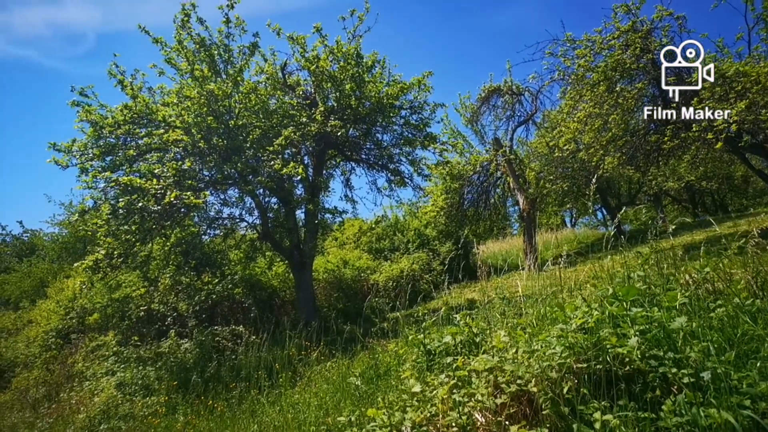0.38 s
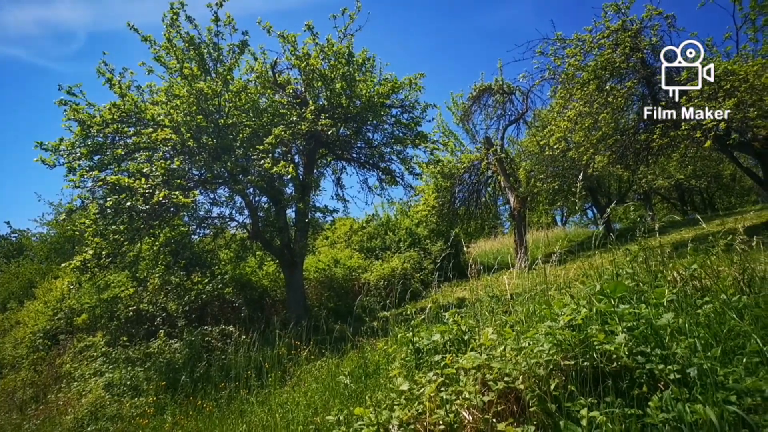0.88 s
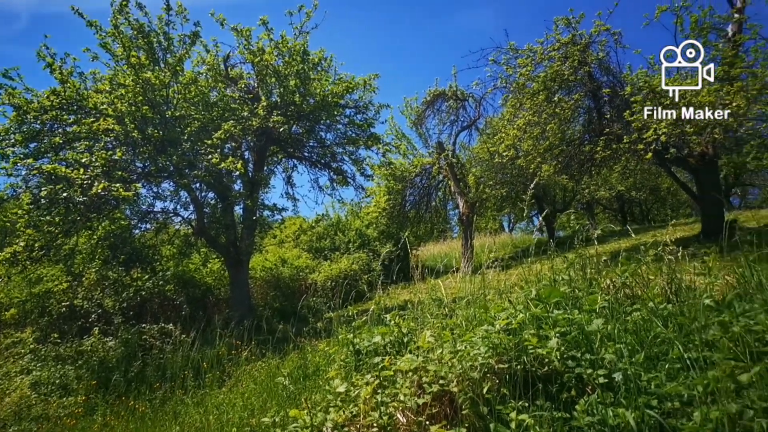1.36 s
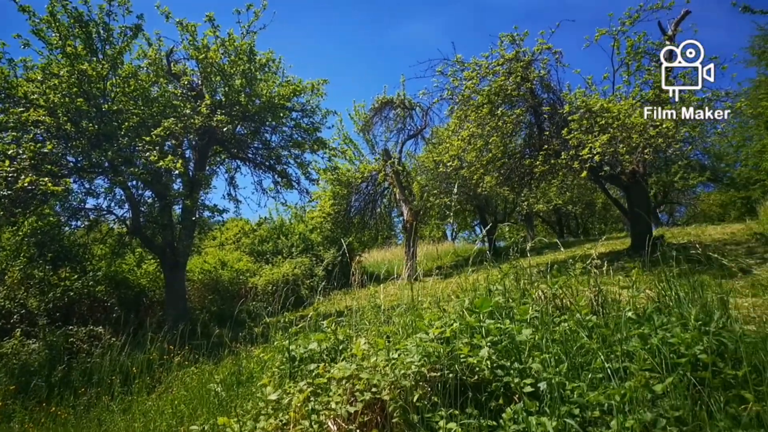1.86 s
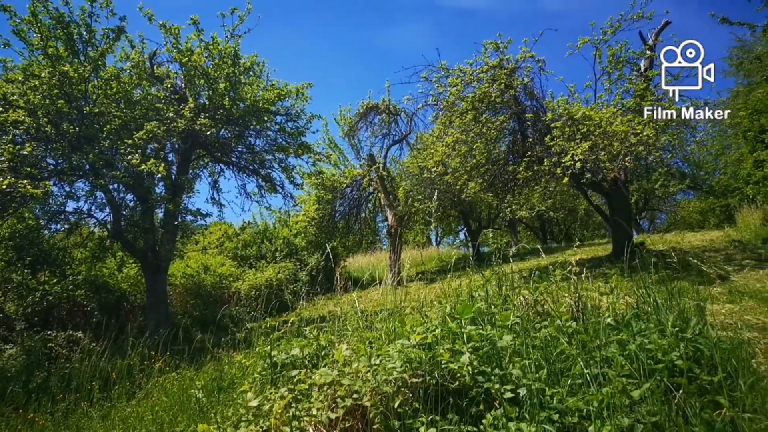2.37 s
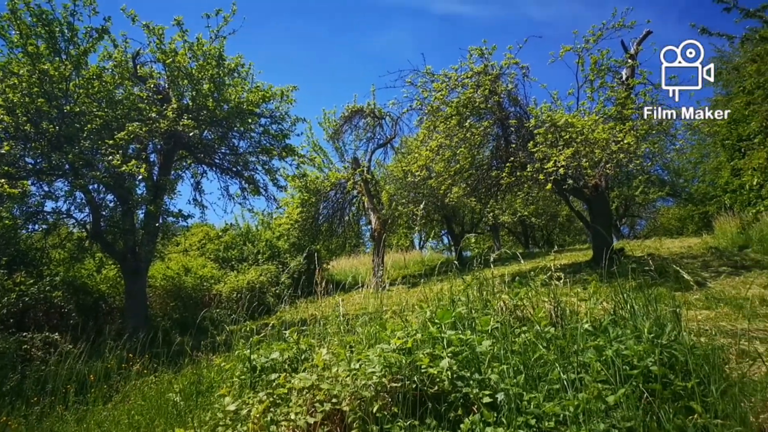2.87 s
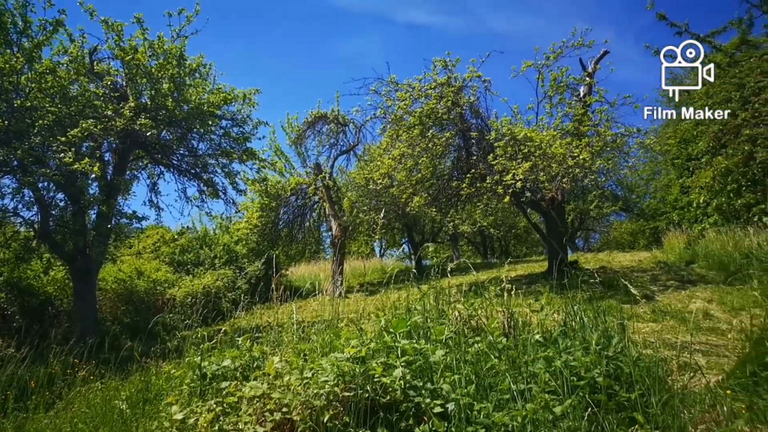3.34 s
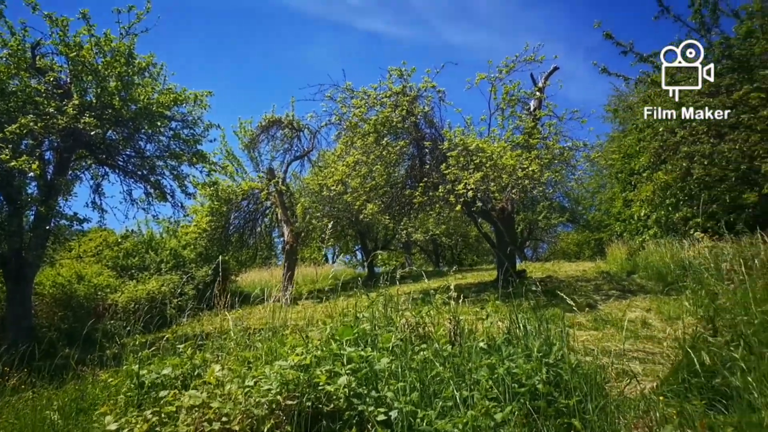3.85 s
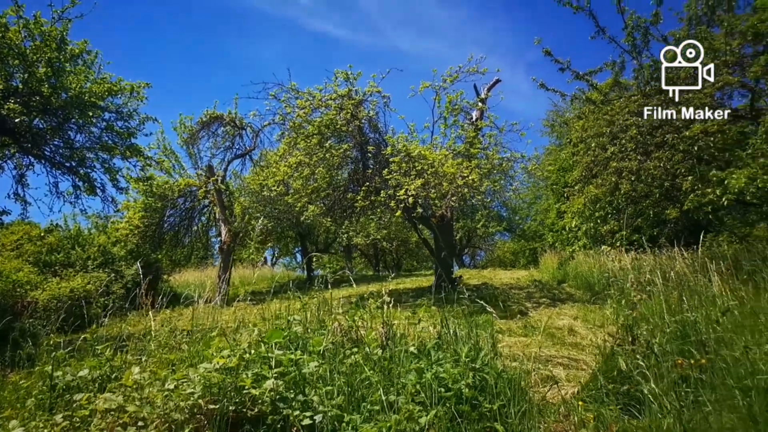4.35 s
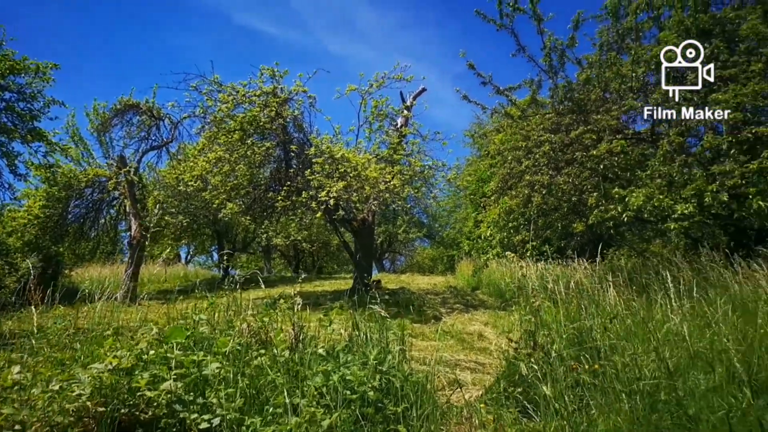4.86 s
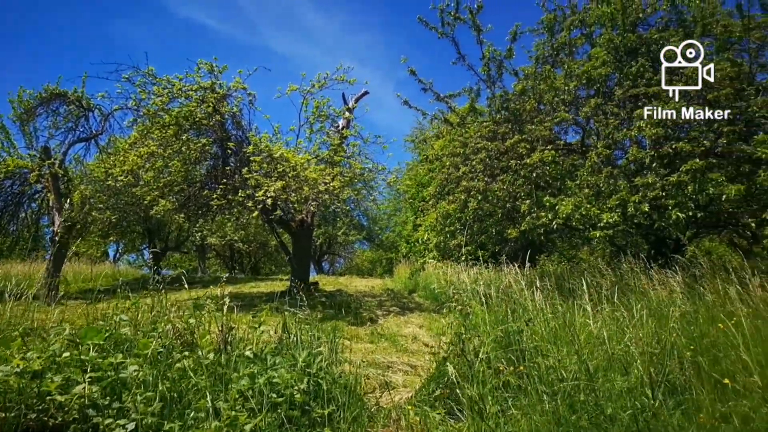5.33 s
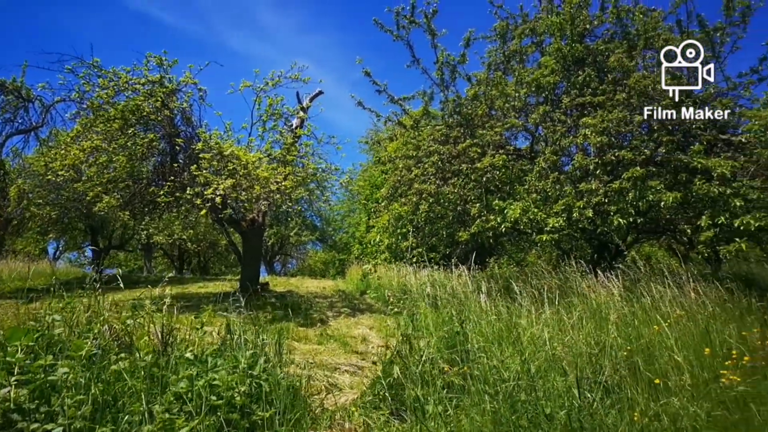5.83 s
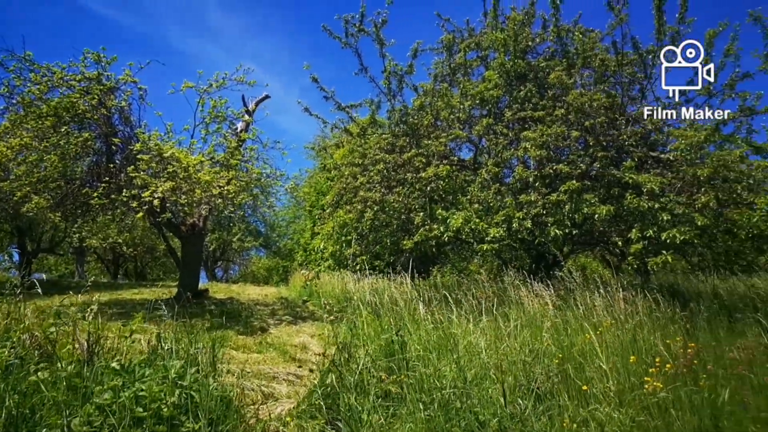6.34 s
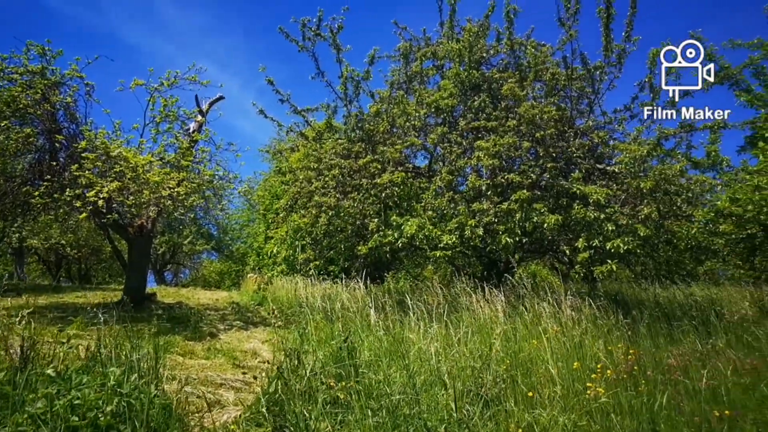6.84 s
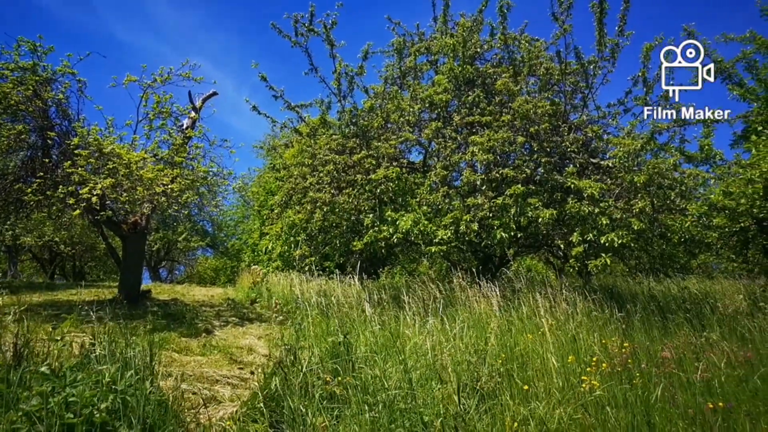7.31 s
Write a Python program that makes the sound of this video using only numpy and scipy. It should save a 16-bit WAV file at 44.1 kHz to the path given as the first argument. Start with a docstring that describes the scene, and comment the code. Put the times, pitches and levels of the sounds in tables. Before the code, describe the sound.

Several songbirds sing at once in an open orchard meadow. Steady high peeps alternate with falling hooks and warbles ahead, while a louder singer on the left gives sharp chirps, loops and a dry churr mid-way. Faint distant twitter fills the gaps. Low wind rumbles softly against the stereo microphone, and a dull thump comes after five seconds, then a softer one. Bright droplet-like notes and peeps close it.

```python
"""Songbirds in an orchard meadow: gliding sine tones make whistled notes, sweeps and fast trills from several
sides, each followed by an echo off a slope and by the decaying noise echoes of the trees. Far birds wheeze and
twitter on randomly modulated tones, and high noise bursts sound during two trills. Filtered noise makes a low drone
that swells in gusts, wind that buffets the two microphone ports, and still air; decaying low sines thump, then
thump softer."""
import sys
import numpy as np
from scipy import signal
from scipy.fft import rfft, irfft, next_fast_len
from scipy.io import wavfile
from scipy.ndimage import uniform_filter1d, map_coordinates

SR = 44100
rng = np.random.default_rng(int(sys.argv[2]) if len(sys.argv) > 2 else 0)


def unload_wav(signal):
    """Save mono or channel-first audio to the path in sys.argv[1] as 16-bit WAV at rate SR, clipped to [-1, 1]."""
    wavfile.write(
        sys.argv[1],
        SR,
        np.round(np.clip(np.atleast_2d(signal).T, -1, 1) * 32767).astype(np.int16),
    )


def makeup_ratio(level_db):
    """Linear amplitude ratio for a level in decibels (20 dB per factor of ten)."""
    decades = np.asarray(level_db, float) / 20
    return 10 ** decades


N = 339570


def unit(x):
    """Normalisation: scales a signal to rms 1."""
    return x / np.sqrt(np.mean(x ** 2) + 1e-20)


def along(points, hz):
    """Logarithmic frequency scale: interpolates (frequency [Hz], value) points."""
    f, v = np.transpose(points)
    return np.interp(np.log(hz + 1), np.log(f + 1), v)


def wobble(rate, size=N):
    """Band-limited fluctuation: a smooth random curve through `rate` knots a second."""
    knots = rng.standard_normal(int(size * rate / SR) + 4)
    return map_coordinates(knots, [np.arange(size) * rate / SR])


def rush(spectrum, alike):
    """Partial coherence: shaped stereo noise of rms 1; `alike` is the correlation of its sides."""
    m = next_fast_len(N)
    gain = makeup_ratio(along(spectrum, np.fft.rfftfreq(m, 1 / SR)))
    mid, side = irfft(rfft(rng.standard_normal((2, m))) * gain, m)[:, :N]
    turn = np.arccos(np.clip(alike, -1, 1)) / 2
    return unit(np.cos(turn) * mid + np.sin(turn) * side * np.array([[1], [-1]]))


def swell(size, rise, fall):
    """Onset and decay: linear ramps in seconds, neither over a third of the sound."""
    t = np.arange(size) / SR
    rise, fall = min(rise, t[-1] / 3), min(fall, t[-1] / 3)
    return np.clip(t / rise, 0, 1) * np.clip((t[-1] - t) / fall, 0, 1)


def add(out, s, hz, gain, lead_ms, overtones=((1, 0),)):
    """Binaural cues: sings a pitch curve with a time and a level difference between the ports."""
    u = np.arange(len(hz))
    for port, side in zip(out, (1, -1)):
        heard = u + side * lead_ms * SR / 2000  # a positive lead brings the left port forward
        turns = np.interp(heard, u, np.cumsum(hz) / SR)
        voice = sum(makeup_ratio(db) * np.sin(2 * np.pi * k * turns) for k, db in overtones)
        shade_db = side * (14 * lead_ms - .7)
        note = np.sqrt(2) * makeup_ratio(shade_db) * np.interp(heard, u, gain) * voice
        spot = port[round(s * SR):][:len(u)]
        spot += note[:len(spot)]


def whistle(out, s, length, a, b, c, db, lead_ms, rise=0.00867, waver_db=0):
    """Frequency modulation: an arc through three pitches; held notes are pure, quick steep ones hoarse."""
    size = round((length + 0.004616) * SR)
    u = np.linspace(0, 1, size)
    hz = a * (1 - u) * (1 - 2 * u) + 4 * b * u * (1 - u) + c * u * (2 * u - 1)
    steep = min(np.ptp(hz) / length / 45000, 1)
    hz = hz * (1 + (.0015 + .03 * steep) * wobble(350, size))
    level_db = db + (2.0965 + 2.18 * steep) * wobble(103.15, size) + waver_db * wobble(34.23, size)
    add(out, s - .002, hz, makeup_ratio(level_db) * swell(size, rise, 0.00439), lead_ms)


def trill(out, s, length, a, b, sweep, rate, db, lead_ms, rough=0.026, overtones=((1, 0),), rasp_per_s=500):
    """Periodic frequency modulation: repeated sweeps; the voice weakens while the pitch jumps back."""
    t = np.arange(round(length * SR)) / SR
    beat = (t * rate + 0.017 * wobble(80, len(t))) % 1
    # averaging over this share of a beat rounds the jump back
    saw = uniform_filter1d(beat - .5, size=max(round(0.283 * SR / rate), 1))
    hz = a + (b - a) * t / length + sweep * saw
    pulse = .4 + np.sin(np.pi * beat)
    gain = makeup_ratio(db + 1.8 * wobble(150, len(t))) * pulse * swell(len(t), .006, .012)
    add(out, s, hz * (1 + rough * wobble(rasp_per_s, len(t))), gain, lead_ms, overtones)


AHEAD_LEAD_MS = .0033  # left lead of the singer ahead

# Arrival-time lead of the left singer as the ports turn: (time [s], left lead [ms])
LEFT_SINGER_LEAD = [(0, 0.237), (1.5, 0.0906), (3.8, 0.1615), (4.3, 0.23), (6.1, 0.2293), (7.7, 0.14)]


def singer_lead(singer, s):
    """Interaural time difference: how many milliseconds a singer reaches the left port first."""
    if singer == "left":
        return np.interp(s, *np.transpose(LEFT_SINGER_LEAD))
    return {"ahead": AHEAD_LEAD_MS, "far left": .265}[singer]


# Arrival-time lead of the trilling birds: (time [s], left lead [ms])
TRILL_SINGER_LEAD = [(.5, 0.038), (1.3, 0.0557), (2.25, 0.1303), (2.8, 0.12), (3.3, 0.1457), (4, 0.3057),
                     (6.5, 0.248), (7.5, 0.019)]


def trill_lead(s):
    """Interaural time difference: the left lead of trills, interpolated over time."""
    return np.interp(s, *np.transpose(TRILL_SINGER_LEAD))


# Strength of wind and drone: (time [s], buffet level [dB], drone level [dB])
GUST_LEVELS = [(0, -56.5, -64), (.35, -58, -49.5), (.85, -61, -49), (1.15, -43.5, -44), (1.7, -58, -54),
               (2.05, -55, -44), (2.45, -61, -54), (2.7, -55, -58.5), (3.2, -61.5, -60.5),
               (3.501, -64, -57.5), (4.3, -57.5, -56), (5.0, -54, -62), (5.35, -58, -47.5),
               (5.7, -56, -57.5), (6.3, -58.5, -67), (6.6, -51, -55), (7.349, -49, -60),
               (7.7, -48.5, -56.5)]


def gust_db(column):
    """Slow amplitude modulation: one level column interpolated over the scene."""
    points = np.transpose(GUST_LEVELS)
    return np.interp(np.arange(N) / SR, points[0], points[column])


# Spectrum of the wind at a port: (frequency [Hz], relative density [dB per Hz])
BUFFET_SPECTRUM = [(18, -120), (24, -6.5), (60, 2.5), (110, -8.5), (200, -25.5), (400, -120)]


def wind_buffets():
    """Turbulent pressure: low noise, nearly independent at each port, in random lumps."""
    lumps_db = 2.37 * np.array([wobble(7), wobble(13)]) + np.array([[-1.8], [1.8]])
    return makeup_ratio(gust_db(1)) * unit(makeup_ratio(lumps_db) * rush(BUFFET_SPECTRUM, 0.22))


# Spectrum of the drone: (frequency [Hz], relative density [dB per Hz])
DRONE_SPECTRUM = [(50, -53.5), (100, 0.5), (200, -2), (260, -5), (320, -22.5), (400, -18), (520, -29.5),
                  (900, -120)]


def drone():
    """High coherence: gusty low noise almost common to both ports."""
    return makeup_ratio(gust_db(2) + 1.6 * wobble(4)) * rush(DRONE_SPECTRUM, .93)


# Spectrum of the still air: (frequency [Hz], relative density [dB per Hz])
AIR_SPECTRUM = [(120, -45.5), (200, -5), (244, -3.5), (304, -6), (890, -20), (2850, -24), (5700, -35),
                (8670, -39.5), (15500, -34)]


def still_air():
    """Diffuse field: steady broadband noise with little likeness between the ports."""
    return makeup_ratio(-64.5 + 0.18 * wobble(4.0)) * rush(AIR_SPECTRUM, 0.046)


def twitter(out):
    """Superposition: 300 faint whistles at random times, pitches and sides."""
    for p in rng.random((300, 6)):
        pitch = 1600 * 2.6 ** p[1]
        middle, end = pitch * (.85 + .3 * p[3]), pitch * (0.687 + 0.651 * p[4])
        whistle(out, p[0] * N / SR, 0.01467 + 0.079 * p[2], pitch, middle, end, -83 + 7 * p[5], .4 * p[3] - .15)


# Notes that glide one way, by singer: (time [s], length [s], start [Hz], end [Hz], level [dB])
GLIDES = {"left": [ (.029, 0.054, 2820, 2220, -48.5), (.078, 0.063, 2187, 2038, -52),
          (1.594, 0.0158, 2525, 5340, -51), (1.609, 0.0153, 4445, 5800, -41.5),
          (1.654, 0.0373, 6030, 3516, -41), (1.686, 0.01735, 3542, 3045, -43.5),
          (1.896, 0.0254, 3927, 3002, -46.5), (2.037, 0.0458, 1248, 2378, -49),
          (2.123, 0.0689, 2357, 1395, -52.5), (2.366, 0.0211, 3900, 2954, -43.5),
          (2.39, 0.021, 2934, 2808, -43.5), (2.466, .016, 5500, 4200, -42),
          (2.526, 0.0297, 2800, 3293, -35.5), (2.617, 0.0399, 1395, 1716, -49.5),
          (2.718, 0.023, 4100, 3100, -44), (2.973, 0.028, 4050, 3050, -46),
          (3.868, 0.0195, 2603, 2034, -41.5), (2.948, 0.0214, 2815, 3598, -35.5),
          (3.177, 0.0279, 1700, 1509, -55), (3.295, 0.01276, 2008, 3582, -37.5),
          (3.309, 0.0158, 3470, 2287, -44), (3.326, 0.0168, 3552, 2903, -39.5),
          (1.79, 0.0424, 2580, 2786, -56.5), (3.317, 0.0135, 4907, 3203, -48),
          (3.353, 0.0365, 1941, 2166, -45.5), (3.722, 0.024, 3800, 2050, -35),
          (3.842, 0.0191, 3800, 2100, -39), (4.141, 0.0299, 1700, 1525, -50),
          (4.303, 0.00659, 7474, 3630, -56.5), (4.354, 0.049, 1477, 1311, -62.5),
          (6.27, 0.0252, 2259, 3077, -37.5), (6.437, 0.0161, 4538, 3090, -50),
          (6.46, 0.0197, 5612, 4404, -47.5), (6.635, 0.0278, 2302, 3094, -38),
          (7.06, 0.00955, 2180, 1998, -39), (7.11, 0.024, 4110, 3380, -41),
          (7.426, 0.0203, 4335, 4294, -43.5), (7.432, 0.0167, 5210, 3374, -46.5),
          (7.486, 0.0506, 3210, 2606, -34.5), (7.641, 0.0318, 2304, 1828, -45)],
          "ahead": [ (.74, 0.189, 4345, 4652, -67), (.29, 0.161, 3204, 3085, -66.5),
          (1.065, 0.037, 4346, 3360, -63), (1.084, 0.0257, 3150, 7040, -58.5),
          (1.17, 0.0277, 5130, 3116, -56.5), (1.509, 0.0168, 3386, 3905, -52.5),
          (1.534, 0.0132, 5530, 3047, -55), (2.527, .078, 1950, 1930, -63),
          (4.078, 0.0273, 2553, 2209, -58), (4.192, 0.038, 2350, 2960, -62.5),
          (4.888, 0.101, 2451, 2219, -57), (5.095, 0.0621, 2916, 2340, -54.5),
          (4.82, 0.0652, 1941, 2020, -64.5), (5.44, 0.1264, 1997, 1940, -73.5),
          (5.76, 0.167, 2229, 2031, -65.5), (3.255, 0.0373, 1018, 1305, -67.5),
          (3.685, 0.0454, 2473, 2434, -68), (.03, 0.108, 2837, 2793, -64), (4.24, 0.078, 2599, 2587, -67),
          (1.068, .03, 6000, 5100, -67), (1.075, 0.0294, 7957, 6680, -69), (6.01, 0.047, 5130, 4988, -71),
          (4.1, 0.0697, 2131, 2210, -56), (4.368, 0.038, 3520, 3390, -55), (4.07, 0.062, 3220, 3560, -55),
          (4.822, 0.028, 3310, 3061, -49.5), (4.938, 0.0498, 3230, 2890, -51),
          (6.345, 0.0092, 1898, 1492, -50.5), (6.383, 0.0349, 1760, 1478, -45.5),
          (6.52, 0.133, 2304, 2411, -62.5), (6.718, 0.0092, 2320, 1573, -48),
          (6.756, 0.0183, 1927, 1508, -45), (6.85, 0.0165, 1524, 2500, -57.5),
          (6.942, 0.0528, 2653, 2426, -50.5), (7.179, .013, 4200, 2350, -51),
          (6.846, 0.0106, 2395, 3913, -57.5), (7.658, .045, 1720, 1500, -46)],
          "far left": [(7.29, .022, 3900, 3000, -53), (7.311, .024, 2980, 2850, -48),
          (7.322, .04, 3600, 2650, -53)]}


def glides(out):
    """Frequency glide: notes that rise or fall, with 60 percent of the way done by mid-note."""
    for singer, notes in GLIDES.items():
        for s, length, a, c, db in notes:
            whistle(out, s, length, a, a + .6 * (c - a), c, db, singer_lead(singer, s))


def scattered_tone(out, s, length, a, b, width, db):
    """Random frequency modulation: fast pitch scatter spreads a tone into a noisy band."""
    size = round(length * SR)
    hz = np.linspace(a, b, size) + width * wobble(900, size)
    gain = makeup_ratio(db + 7.08 * wobble(200.9, size)) * swell(size, 0.0623, 0.015)
    add(out, s, hz, gain, .2)


# Breathy far calls: (time [s], length [s], start [Hz], end [Hz], level [dB])
WHEEZE_CALLS = [(0.079, 0.235, 771.5, 726.5, -71), (0.988, 0.196, 6405, 6602, -73),
                (1.391, 0.28, 5669, 6730, -74), (1.95, 0.297, 5598, 7034, -80)]


def wheezes(out):
    """Proportional bandwidth: breathy calls whose pitch scatter is a share of the starting pitch."""
    for s, length, a, b, db in WHEEZE_CALLS:
        scattered_tone(out, s, length, a, b, 0.053 * a, db)


# Held notes on one pitch: (time [s], length [s], level [dB], left lead [ms])
PEEP_NOTES = [(0.352, 0.1298, -62.5, 0.0029), (0.781, 0.1684, -58.5, 0.0031),
              (1.244, 0.1397, -51.5, 0.0032), (1.692, 0.1148, -45.5, 0.0028), (2.147, 0.107, -55.5, .003),
              (7.087, 0.1156, -50.5, 0.1996), (7.534, 0.1344, -45, 0.1887)]


def peeps(out):
    """Near-constant frequency: held tones that droop slightly at both ends and waver in level."""
    hz, droop_hz = 4390, 29.7
    for s, length, db, lead_ms in PEEP_NOTES:
        whistle(out, s, length, hz - droop_hz, hz, hz - droop_hz, db, lead_ms, rise=0.0161, waver_db=3.5)


# Warbles of upward sweeps: (time [s], length [s], start [Hz], end [Hz], level [dB])
WARBLE_NOTES = [(.486, 0.0577, 3363, 3637, -54), (0.613, 0.0605, 3384, 3613, -53),
                (1.228, 0.076, 3338, 2939, -51.5), (1.298, 0.0662, 2767, 3377, -50.5)]


def warbles(out):
    """Fixed modulation rate: upward sweeps at one pace of 43 a second."""
    for s, length, a, b, db in WARBLE_NOTES:
        trill(out, s, length, a, b, 620, 43, db, trill_lead(s))


# Falling hooks between the peeps: (time [s], level [dB])
HOOK_NOTES = [(0.546, -51.5), (1.001, -49.5), (1.449, -45.5)]
# Their shape: (length [s], start [Hz], middle [Hz], end [Hz])
HOOK_SHAPE = (.043, 4090, 3140, 2950)


def hooks(out):
    """Decelerating glide: the pitch falls fast, then levels off."""
    for s, db in HOOK_NOTES:
        whistle(out, s, *HOOK_SHAPE, db, AHEAD_LEAD_MS)


# Low trills of upward sweeps: (time [s], length [s], start [Hz], end [Hz], level [dB])
LOW_TRILLS = [(1.208, 0.144, 2282, 2480, -63.5), (1.365, 0.0577, 2204, 2850, -49.5),
              (2.808, .095, 2080, 2480, -46), (3.078, 0.0684, 1560, 1600, -54),
              (4.013, 0.1275, 1683, 1753, -54), (5.161, 0.1732, 2482, 2528, -54),
              (7.513, 0.0868, 2598, 2720, -47)]


def low_trills(out):
    """Rate proportional to pitch: one sweep per 39.5 cycles, so higher trills are quicker."""
    for s, length, a, b, db in LOW_TRILLS:
        trill(out, s, length, a, b, 540, (a + b) / 2 / 39.5, db, trill_lead(s))


# Notes that turn and come back, by singer: (time [s], length [s], edge [Hz], turning pitch [Hz], level [dB])
TURNING_NOTES = {"left": [(4.299, .016, 3950, 4700, -50), (2.951, 0.0331, 3712, 4160, -48),
                 (3.748, 0.0222, 2569, 2123, -43.5), (7.094, 0.028, 2937, 3374, -39.5)],
                 "ahead": [(1.475, 0.037, 3376, 2934, -49), (4.404, 0.092, 3330, 2960, -51),
                 (4.752, 0.0574, 3430, 2647, -55), (5.066, 0.0395, 2777, 2939, -54),
                 (5.443, .055, 2850, 3450, -64), (5.7, 0.0544, 2307, 2441, -66),
                 (5.835, 0.081, 1630, 1924, -57), (7.079, 0.0125, 2250, 2785, -44.5)]}


def bends(out):
    """Parabolic pitch: each note bends to a turning pitch and returns."""
    for singer, notes in TURNING_NOTES.items():
        for s, length, edge, turn, db in notes:
            whistle(out, s, length, edge, turn, edge, db, singer_lead(singer, s))


# Two-note loops: (time [s], level [dB])
LOOP_NOTES = [(1.754, -47.5), (1.828, -47), (1.907, -47)]
# Shapes of the two notes: (length [s], start [Hz], middle [Hz], end [Hz])
GRACE_SHAPE = (0.009, 2150, 2500, 1900)
ARCH_SHAPE = (.029, 1950, 3220, 1920)


def loops(out):
    """Overlapping onsets: a short grace note, then a tall arch 11 ms later."""
    for s, db in LOOP_NOTES:
        lead_ms = singer_lead("left", s)
        whistle(out, s, *GRACE_SHAPE, db, lead_ms)
        whistle(out, s + 0.011, *ARCH_SHAPE, db - 1.5, lead_ms)


# A row of like arcs: (time [s], level [dB])
ARC_NOTES = [(2.277, -54.5), (2.412, -52), (2.571, -57.5), (2.738, -54.5), (2.875, -51), (3.068, -61)]
# Their shape: (length [s], start [Hz], middle [Hz], end [Hz])
ARC_SHAPE = (0.0878, 2400, 3220, 3120)


def arcs(out):
    """Repeated contour: one pitch arc sung at several levels."""
    for s, db in ARC_NOTES:
        whistle(out, s, *ARC_SHAPE, db, singer_lead("left", s))


# Churrs of downward sweeps: (time [s], length [s], start [Hz], rate [sweeps per s], level [dB])
CHURR_NOTES = [(2.287, 0.1342, 4975, 49.1, -45.5), (2.286, 0.087, 2650, 39.8, -52),
               (3.467, 0.1997, 3129, 120.6, -42), (6.491, 0.0915, 4255, 106, -49.5)]


def churrs(out):
    """Rapid frequency modulation: downward sweeps on a pitch that climbs 2800 Hz a second."""
    for s, length, a, rate, db in CHURR_NOTES:
        sweep = -0.668 * (a - 1700)  # a share of the starting pitch above 1700 Hz
        trill(out, s, length, a, a + 2800 * length, sweep, rate, db, trill_lead(s), rough=0.016)


# High noise bursts: (time [s], length [s], level [dB])
HIGH_NOISE_BURSTS = [(2.294, 0.12, -71.5), (4.475, .17, -74)]


def high_noise_bursts(out):
    """Random frequency modulation: a broad noise band around 12.8 kHz during two trills."""
    for s, length, db in HIGH_NOISE_BURSTS:
        scattered_tone(out, s, length, 12800, 12800, 2000, db)


# One harsh trill: (time [s], length [s], start [Hz], end [Hz], sweep [Hz], rate [sweeps per s],
# level [dB], left lead [ms])
RATTLE_NOTE = (4.485, .188, 1760, 1760, -260, 62, -57, .27)
# Its clear and its hoarse partials: (multiple of the pitch [ratio], level [dB])
CLEAR_PARTIALS = [(2, 4), (4, -7)]
HOARSE_PARTIALS = [(1.6, -6), (2.499, -1), (2.9, 6)]


def rattle(out):
    """Inharmonicity: clear harmonic partials joined by roughened partials off the harmonic series."""
    trill(out, *RATTLE_NOTE, rough=.015, overtones=CLEAR_PARTIALS)
    trill(out, *RATTLE_NOTE, rough=.07, overtones=HOARSE_PARTIALS, rasp_per_s=1800)


# Low thumps: (time [s], starting level [dB], frequency [Hz], left over right [dB])
THUMP_HITS = [(5.099, -36, 110.6, -13), (5.597, -38.5, 42.3, 7.5)]


def thumps():
    """Damped oscillation: a low sine that loses 60 dB in 0.171 s."""
    out, t = np.zeros((2, N)), np.arange(SR // 5) / SR
    for s, db, hz, pan_db in THUMP_HITS:
        level_db = db + pan_db * np.array([[.5], [-.5]]) - 60 * t / 0.171
        out[:, round(s * SR):][:, :len(t)] += makeup_ratio(level_db) * np.sin(2 * np.pi * hz * t)
    return out


# Two-note chips: (time [s], level of the arch [dB])
CHIP_NOTES = [(6.059, -54.5), (6.153, -47)]
# Shapes of the two notes: (length [s], start [Hz], middle [Hz], end [Hz])
LISP_SHAPE = (.014, 3700, 4500, 5300)
CHIP_SHAPE = (.018, 3400, 4330, 3000)


def chips(out):
    """Contrasting glides: a thin rising lisp, then a sharp arch that overlaps its end."""
    for s, db in CHIP_NOTES:
        lead_ms = singer_lead("left", s)
        whistle(out, s, *LISP_SHAPE, db - 4, lead_ms)
        whistle(out, s + 0.01266, *CHIP_SHAPE, db, lead_ms)


# Upward flicks that lead into low falling notes: (time [s], level [dB])
PICKUP_NOTES = [(6.333, -59.5), (6.37, -56), (6.707, -59), (6.744, -57.5)]
# Their shape: (length [s], start [Hz], middle [Hz], end [Hz])
PICKUP_SHAPE = (.008, 1500, 1900, 2300)


def pickups(out):
    """Linear glide: the pitch of each flick rises evenly."""
    for s, db in PICKUP_NOTES:
        whistle(out, s, *PICKUP_SHAPE, db, AHEAD_LEAD_MS)


# A falling note that shakes: (time [s], length [s], start [Hz], end [Hz], sweep [Hz],
# rate [sweeps per s], level [dB])
QUAVER_NOTE = (6.863, .058, 2280, 1780, -480, 100, -46.5)


def quaver(out):
    """Fast vibrato: repeated downward sweeps shake a falling note."""
    trill(out, *QUAVER_NOTE, AHEAD_LEAD_MS)


# A falling run of flicks: (time [s], middle pitch [Hz], level [dB])
DROPLET_NOTES = [(7.192, 2750, -47), (7.207, 2370, -45), (7.229, 2000, -43), (7.262, 1779, -42),
                 (7.296, 1667, -41), (7.335, 1637, -46)]
# Their shape: (length [cycles of the middle pitch], start [share of it], end [share of it])
DROPLET_SHAPE = (45, .82, .93)


def droplets(out):
    """Scaling: one upward flick at falling pitches, longer as the pitch drops."""
    cycles, start, end = DROPLET_SHAPE
    for s, top, db in DROPLET_NOTES:
        whistle(out, s, cycles / top, start * top, top, end * top, db, AHEAD_LEAD_MS)


def slope_echo(near):
    """Specular reflection: one weaker copy 13 ms later with the sides exchanged."""
    late = np.pad(near, ((0, 0), (round(.013 * SR), 0)))
    return makeup_ratio(-11) * late[::-1, :N]


# Reverberation among the trees: (frequency [Hz], time to decay 60 dB [s])
TREE_DECAY = [(1000, .4), (4000, .35), (10000, .25)]


def trees(x):
    """Scattering: convolution with decaying noise for trunks and leaves, different at each port."""
    hz, t, z = signal.stft(rng.standard_normal((2, SR)), SR, nperseg=256)
    decay_db = -60 * t / along(TREE_DECAY, hz)[:, None]
    tail = signal.istft(z * makeup_ratio(decay_db), SR, nperseg=256)[1]
    tail = np.pad(tail, ((0, 0), (250, 0))) / np.linalg.norm(tail[0])  # silent for the first 250 samples
    return signal.fftconvolve(x, tail, axes=1)[:, :N]


def scene():
    """Superposition: near and far layers, their slope and tree echoes, and the low bed."""
    near, far = np.zeros((2, N)), np.zeros((2, N))
    for play in (glides, peeps, warbles, hooks, low_trills, bends, loops, arcs, churrs, rattle,
                 chips, pickups, quaver, droplets):
        play(near)
    for play in (twitter, wheezes, high_noise_bursts):
        play(far)
    direct = near + slope_echo(near) + makeup_ratio(-4.0) * far
    echoes = trees(makeup_ratio(-11) * near + far)
    return direct + echoes + wind_buffets() + drone() + still_air() + thumps()


def low_pass(x):
    """Removes everything above the highest recorded frequency."""
    return signal.sosfilt(signal.butter(12, 15670, fs=SR, output="sos"), x)


def record(dry):
    """Signal chain: passes the finished mix to its last stage."""
    return low_pass(dry)


dry = scene()
out = record(dry)
unload_wav(out)
```